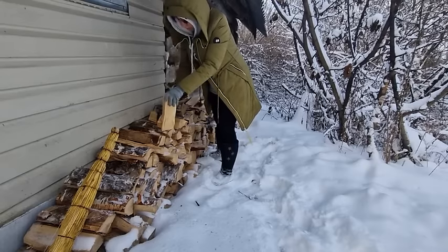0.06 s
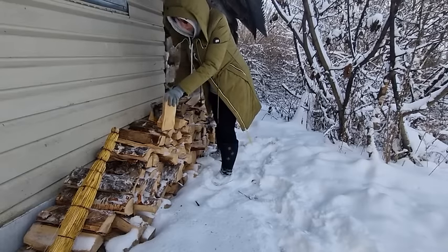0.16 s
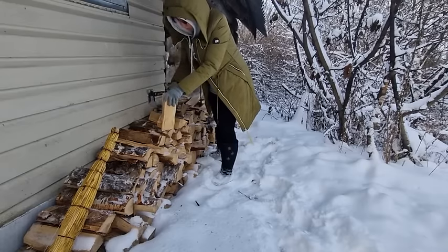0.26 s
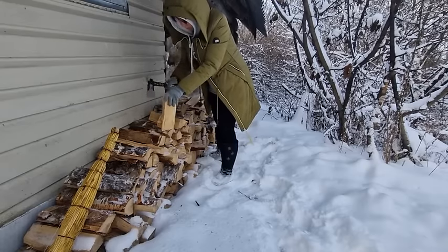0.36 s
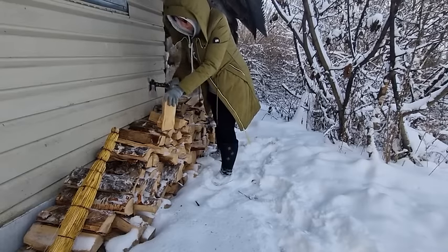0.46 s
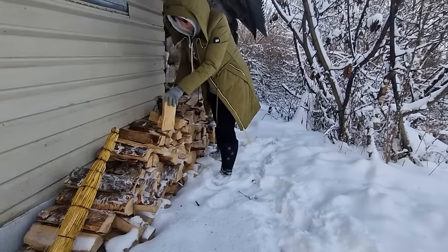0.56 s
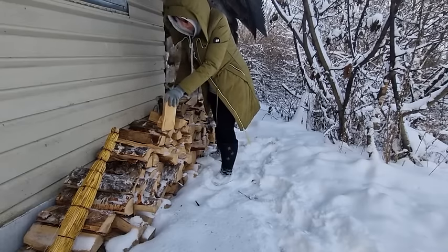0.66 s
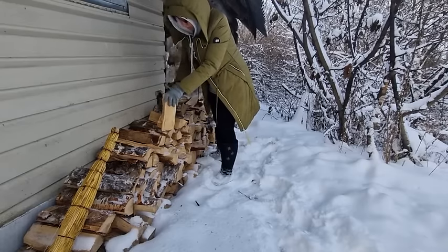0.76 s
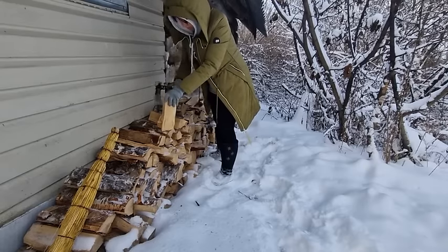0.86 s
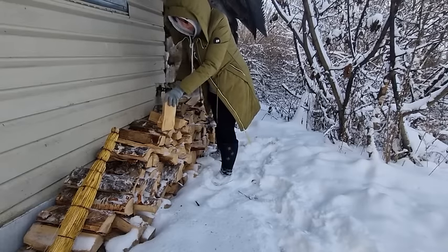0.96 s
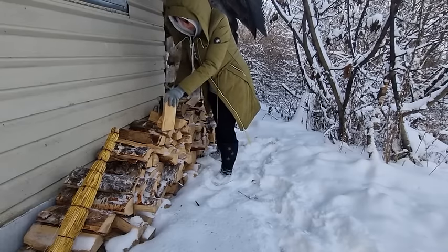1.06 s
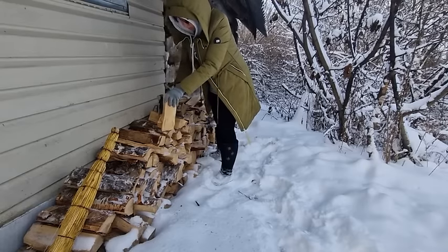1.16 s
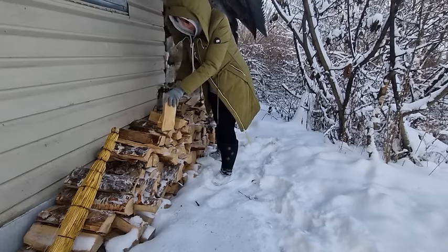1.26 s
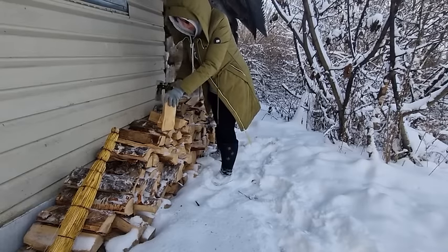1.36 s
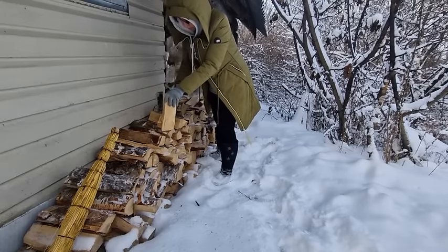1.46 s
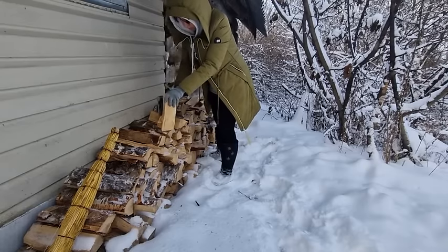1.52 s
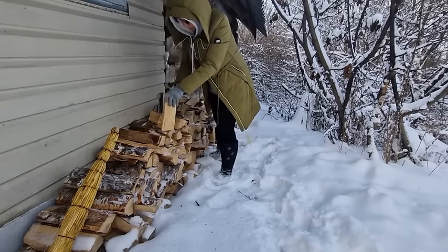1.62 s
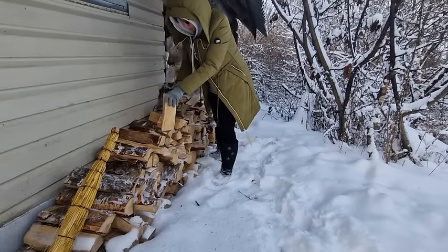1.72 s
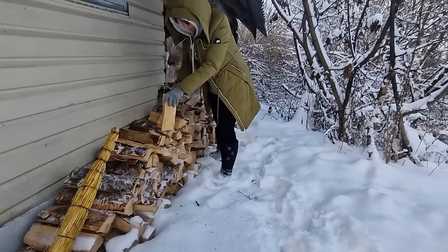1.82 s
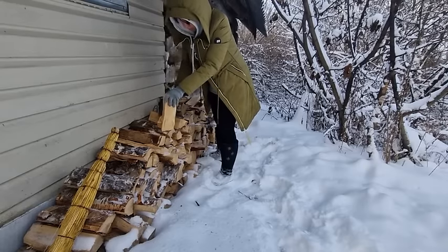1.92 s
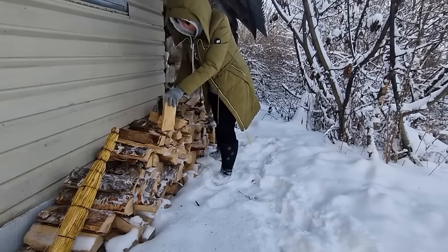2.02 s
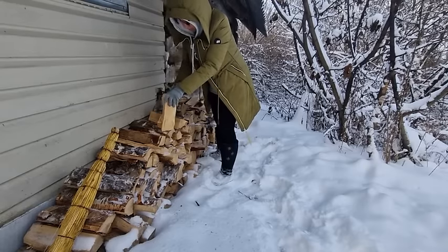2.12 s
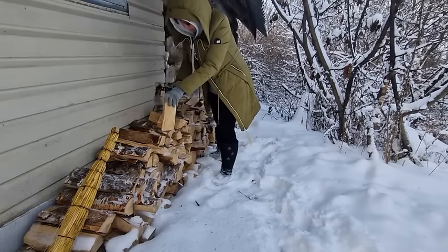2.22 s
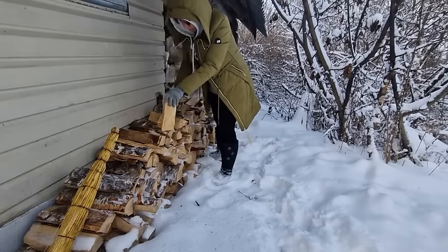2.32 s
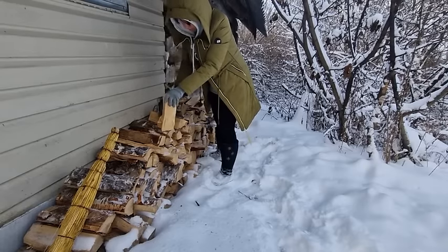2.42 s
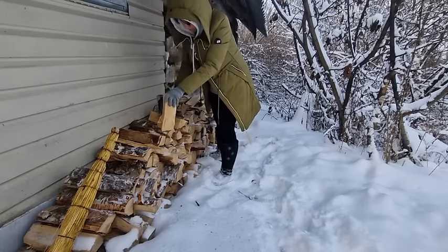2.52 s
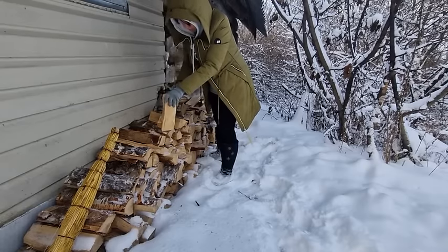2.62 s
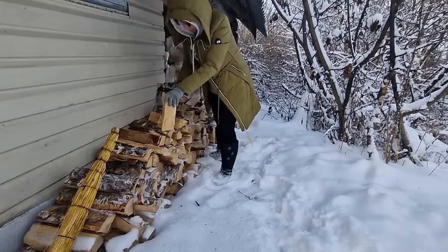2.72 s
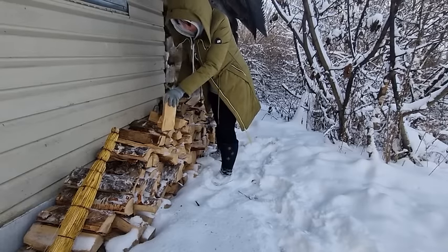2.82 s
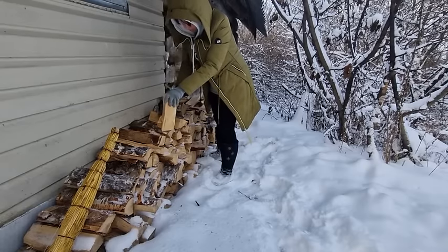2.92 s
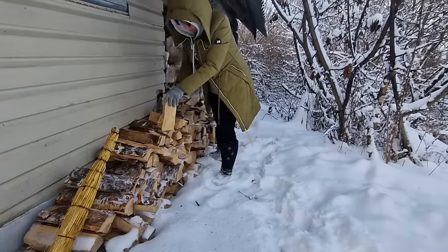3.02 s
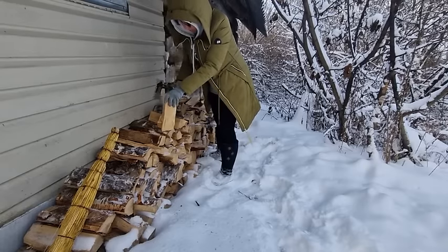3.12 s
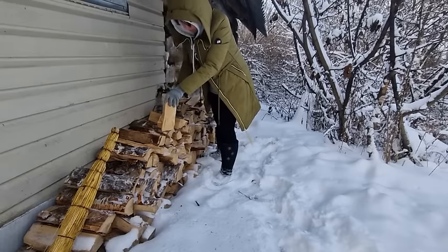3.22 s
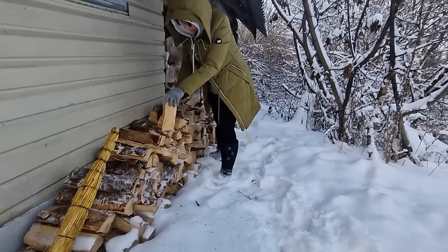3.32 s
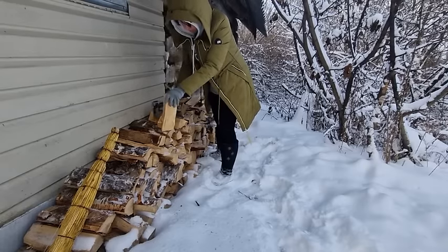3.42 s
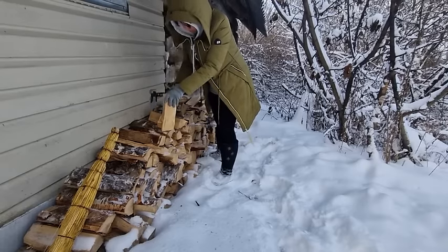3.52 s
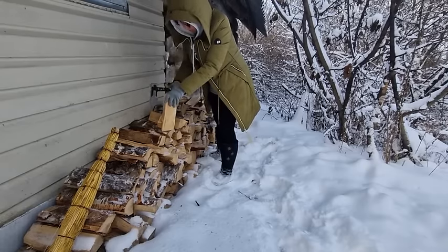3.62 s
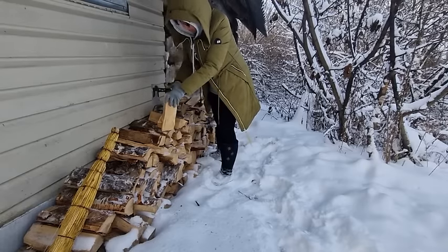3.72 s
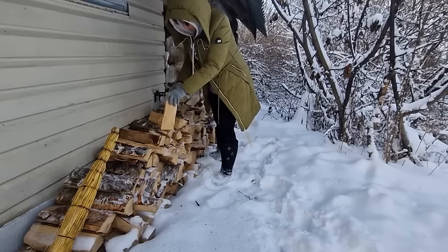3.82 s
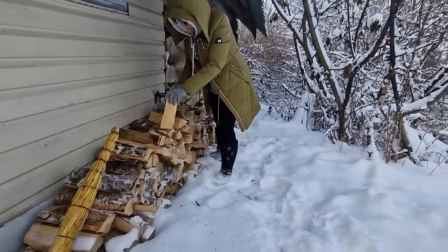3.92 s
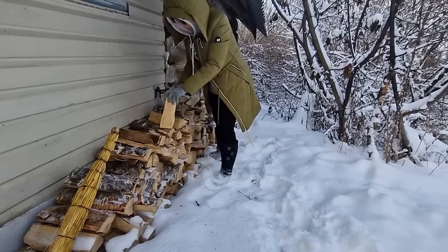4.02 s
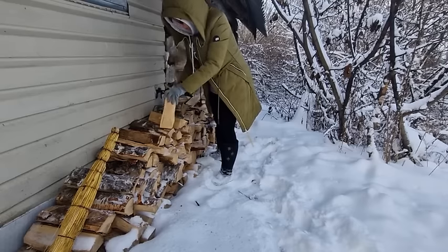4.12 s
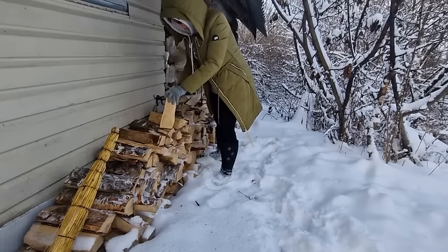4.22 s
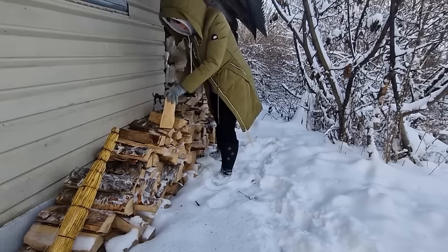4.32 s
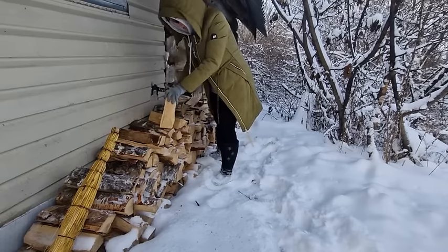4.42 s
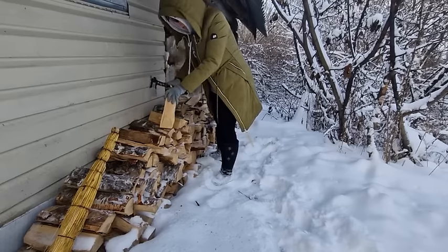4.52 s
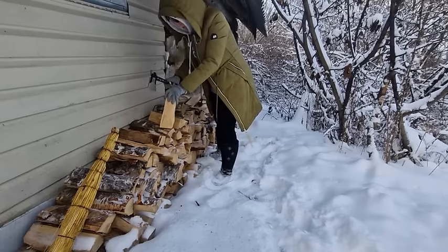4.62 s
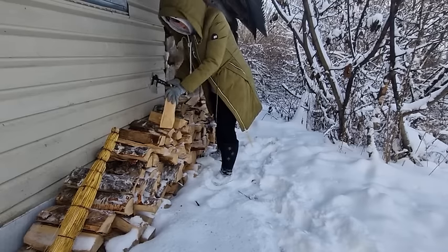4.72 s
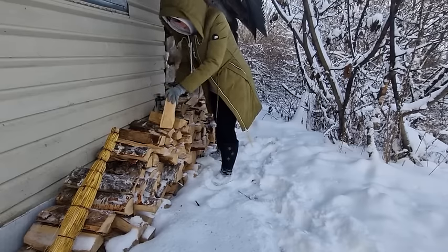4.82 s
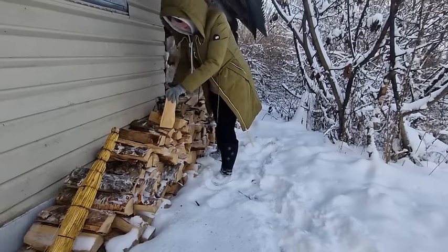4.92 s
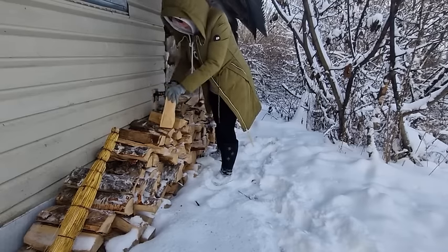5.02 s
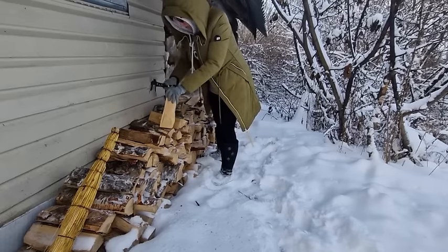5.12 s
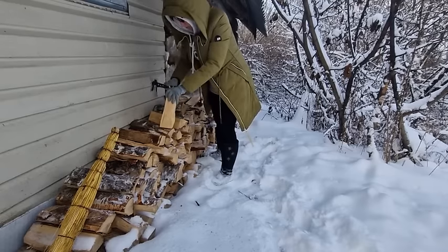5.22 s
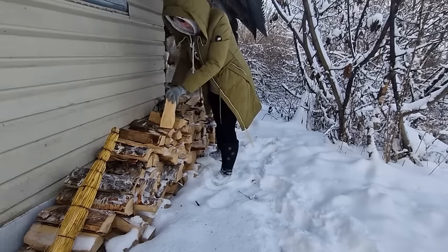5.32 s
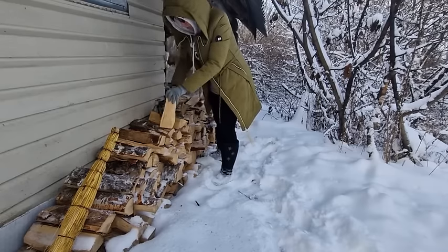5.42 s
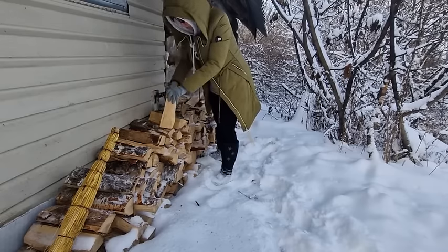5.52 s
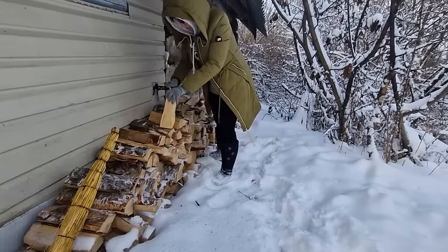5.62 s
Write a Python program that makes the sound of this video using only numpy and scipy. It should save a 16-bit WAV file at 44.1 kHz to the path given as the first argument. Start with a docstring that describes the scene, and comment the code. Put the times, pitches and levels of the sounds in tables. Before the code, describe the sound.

Outdoors in still winter air, a small hatchet chops an upright billet standing on a woodpile, close and slightly left in stereo. A light touch at 0.11 s leads straight into a hard, bright crack at 0.16 with a hollow knock around 800 Hz; small pieces tick after it. Blows follow at 0.66 (duller), 1.13, 1.57, a soft one at 2.0, a crisp one at 2.45, a weak one at 2.92, and a quick double at 3.38 and 3.45, bright then dull. Each thumps the support log and rocks the pile with a short low rumble. From about 3.6 to 4.9 there is a pause: a faint squeak, very soft coat rustle near 3.8-4.4. A thin, dry, bright crack comes at 4.94, a tick at 5.01, a tiny squeak at 5.34, then at 5.43 a sharp tearing split with a short ringing sliver and a last faint squeak. Wall and logs reflect tightly; trees answer faintly.

```python
"""A hatchet splits kindling off a billet on a woodpile, left of the microphones, by a house wall in deep snow.
Each blow is a burst of crushing fibres that rings blade, billet and support log as decaying modes;
low modes and dying noise rock the pile. Tears are fading crackles, and the last blow frees a ringing sliver.
Loose pieces tick, the billet squeaks faintly and a coat rustles in the pause, over still air of shaped noise.
The wall, the logs and the distant trees send the sound of the work back."""
import sys
import numpy as np
from scipy import signal
from scipy.fft import rfft, irfft, next_fast_len
from scipy.io import wavfile

SR = 44100
rng = np.random.default_rng(int(sys.argv[2]) if len(sys.argv) > 2 else 0)


def output_pcm(signal):
    """Save a mono or channel-first signal as 16-bit PCM at the path in sys.argv[1].

    Samples are clipped to [-1, 1] before scaling.
    """
    pcm = np.clip(np.atleast_2d(signal).T, -1, 1) * 32767
    wavfile.write(sys.argv[1], SR, np.round(pcm).astype(np.int16))


N = 249606

# Source levels are nominal: random spread, reflections and the side balance come on top.
# The blows: t/s, crack level/dB, crack treble roll-off f/Hz, billet level/dB,
# billet overtone tilt [dB per octave], support log level/dB, thump level/dB
BLOWS = [(0.1125, -32, 9000, -31, 0, -25.5, -23.5), (0.1603, -18.5, 12980, -11, 0, -18.5, -17.5),
         (0.6580, -17.5, 6810, -24, 7.5, -20.5, -10), (1.1332, -18.5, 9800, -12, 0, -17, -9.5),
         (1.5730, -15.5, 5800, -12, 0, -16, -12.5), (2.0034, -30, 8500, -27, 1, -26.5, -17),
         (2.4490, -17.2, 13000, -21.5, 4.5, -19.5, -12.5), (2.9232, -26.5, 14000, -29.5, 5.5, -22, -19),
         (3.3836, -16, 11500, -30, -1, -18, -21), (3.4497, -21, 1700, -27, 7, -20.5, -15.5),
         (4.9440, -22.5, 22000, -37, -1, -42, -20.5), (5.4315, -26, 6500, -44, 8, -49, -37),
         (5.4385, -19, 32000, -42, -1, -46, -22.5)]
# Spectrum of tearing and easing fibres: f/Hz, level/dB (per Hz)
FIBRE_SPECTRUM = [(200, -5.5), (700, 5), (1500, -0.5), (2500, -1), (4000, -1.5), (8500, -0.5),
                  (11000, -5.5), (16000, -4.5)]
# Left-right likeness of the fibre sounds: f/Hz, correlation [0 to 1]
CRACK_LIKENESS = [(500, 0.9245), (1500, .6), (3000, 0.9), (6000, 0.12), (15000, 0.13)]
# Left-right likeness of the air and the coat: f/Hz, correlation [0 to 1]
AIR_LIKENESS = [(100, 0.58), (400, 0.41), (1500, 0.27), (6000, 0.11)]


def amp(db):
    """Amplitude factor of a level in dB."""
    return 10 ** (np.asarray(db) / 20)


def read(points, hz):
    """A table's value at hz, on a log-frequency axis."""
    f, value = np.transpose(points)
    return np.interp(np.log(hz + 1), np.log(f), value)


def add(mix, s, sound):
    """Mixes a sound in from time s, cut off at the end of the mix."""
    part = mix[..., round(s * SR):][..., :sound.shape[-1]]
    part += sound[..., :part.shape[-1]]


def colour(pair, spectrum, likeness, bright_hz=SR):
    """Gives two noise signals a spectrum, a treble roll-off and a left-right likeness."""
    size = next_fast_len(pair.shape[1] + 1024)
    hz = np.fft.rfftfreq(size, 1 / SR)
    first, second = rfft(pair, size)
    same = np.clip(read(likeness, hz), -1, 1)
    gain = amp(read(spectrum, hz))
    gain = gain / np.sqrt(np.mean(gain ** 2))
    gain = gain / (1 + (hz / bright_hz) ** 2)
    # minimum phase, so that nothing sounds ahead of its onset
    both_halves = np.r_[gain, gain[1:size - len(hz) + 1][::-1]]
    causal = np.exp(np.conj(signal.hilbert(np.log(both_halves))))[:len(hz)]
    sides = np.array([first, same * first + np.sqrt(1 - same ** 2) * second])
    return irfft(sides * causal, size)[:, :pair.shape[1]]


def snaps(t, grain_db):
    """Dense fibre snaps of uneven size, a new size every millisecond."""
    ms = (t * 1000).astype(int)
    size = amp(grain_db * np.clip(rng.standard_normal(ms[-1] + 1), -2, 2))
    return rng.standard_normal((2, len(t))) * size[ms] / np.sqrt(np.mean(size ** 2))


def ring(modes, rise_s, spread_db, pitch=1, detune=.01, chatter_hz=0):
    """Modes swell and die; each strike weights them differently, and a chattering contact widens their lines."""
    t, knots = np.arange(SR) / SR, np.linspace(0, 1, 500)
    hz, db, t60 = np.transpose(modes)[:, :, None]
    weight, drift, phase = rng.standard_normal((3, len(modes), 1))
    # the phase of each mode wanders at random
    steps = rng.standard_normal((len(modes), len(knots)))
    walks = np.cumsum(steps, 1) * np.sqrt(chatter_hz * knots[1] / (2 * np.pi))
    wander = np.array([np.interp(t, knots, walk) for walk in walks])
    waves = np.sin(2 * np.pi * (hz * pitch * (1 + detune * drift) * t + phase + wander))
    decay = np.exp(-np.log(1000) * t / t60)
    swell = 1 - np.exp(-(t / rise_s) ** 2)
    return (amp(db + spread_db * weight) * decay * waves).sum(0) * swell


def crack(spectrum, bite_s, bright_hz, rise_s, uneven_db):
    """Fibres crush for a few milliseconds; each spot of the grain has its own peaks and dips."""
    t = np.arange(SR // 10) / SR
    force = (1 - np.exp(-t / rise_s)) / (1 + (t / bite_s) ** 4.0)
    hz = np.geomspace(100, 16000, 90)
    spot = np.c_[hz, read(spectrum, hz) + uneven_db * rng.standard_normal(len(hz))]
    return colour(snaps(t, grain_db=3.5) * force, spot, CRACK_LIKENESS, bright_hz)


def dying_noise(t60s, levels, size):
    """One second of noise for each side, each band dying at its own speed."""
    hz, t, bands = signal.stft(rng.standard_normal((2, SR)), SR, nperseg=size)
    rate = np.log(1000) / read(t60s, hz)[:, None]
    level = amp(read(levels, hz))[:, None] * np.sqrt(2 * rate / SR)  # same energy however long the decay
    return signal.istft(bands * level * np.exp(-rate * t), SR, nperseg=size)[1][:, :SR]


def still_air():
    """Still winter air: steady noise, strongest in the bass and little alike at the two sides."""
    # Spectrum of the air: f/Hz, level/dB (per Hz)
    air_spectrum = [(20, 4), (60, 1.5), (100, -8), (230, -24.5), (350, -14), (560, -22.5), (800, -22),
                    (1200, -27.5), (2500, -34), (5000, -39), (7000, -44.5), (10000, -48), (16000, -47.5)]
    return amp(-63) * colour(rng.standard_normal((2, N)), air_spectrum, AIR_LIKENESS)


def hatchet():
    """Each blow cracks the grain and rings the blade and the billet, then the log it stands on."""
    # Spectrum of the bite: f/Hz, level/dB (per Hz)
    bite_spectrum = [(100, -10), (350, -0.5), (800, 2.5), (1500, 4.5), (2100, 0), (2600, -5), (3200, -1),
                     (4600, 1.5), (6800, -4), (8200, 2.5), (10000, -4), (15500, -1.5)]
    # Short, high modes of the blade wedged in the grain: f/Hz, level/dB, t60 [s]
    blade_modes = [(3000, -2, 0.029), (3290, -1, 0.033), (3640, -6, 0.01), (4096, -2.5, 0.039),
                   (4755, 2, 0.035), (5110, -1, 0.041), (6330, -0.5, 0.018), (7670, 0.5, 0.028),
                   (8170, -3, 0.019)]
    # Modes of the billet: f/Hz, level/dB, t60 [s]
    billet_modes = [(829.6, 0, 0.072), (937, -10.5, 0.032), (931, -10.5, 0.048), (1026, -7, .052),
                    (1157, -11, .035), (1314, -18, 0.066), (1484, -14, .035), (1520, -11.5, 0.043),
                    (1622, -11.5, 0.064), (2117, -18, 0.053), (2277, -20.5, 0.064)]
    # Modes of the log under the billet: f/Hz, level/dB, t60 [s]
    support_modes = [(229.76, -10.5, 0.14), (305, -9.5, 0.09), (330.3, -6, 0.19), (387, -3, .085),
                     (465, -2.5, .07), (545, -7.5, 0.11), (595, -2.5, .055), (690.5, -2.5, 0.079),
                     (751.5, -8, .08)]
    blade_db = -11.5  # against the crack
    # a firm blow bites for firm_bite_s; a softer one crushes the grain more slowly
    firm_db, firm_bite_s, bite_doubles_db = -20, .0058, 15
    out = np.zeros((2, N))
    for s, crack_db, bright_hz, billet_db, overtone_db, support_db, _ in BLOWS:
        bite_s = firm_bite_s * 2 ** ((firm_db - crack_db) / bite_doubles_db)
        pitch = .987 + .014 * rng.uniform(-1, 1)  # the grip and the footing shift a little
        bite = crack(bite_spectrum, bite_s, bright_hz, rise_s=.0008, uneven_db=2.8)
        add(out, s, amp(crack_db) * bite)
        blade = np.array([ring(blade_modes, rise_s=0.00027, spread_db=2.0, detune=.018, chatter_hz=60)
                          for side in "LR"])
        dulling = 1 + (4500 / bright_hz) ** 2  # a dull blow barely rings the blade
        add(out, s, amp(crack_db + blade_db) / dulling * blade)
        # where the edge lands decides how strongly the billet's higher modes answer
        lowest_hz = billet_modes[0][0]
        tilted = [(hz, db + overtone_db * np.log2(hz / lowest_hz), t60) for hz, db, t60 in billet_modes]
        billet = ring(tilted, rise_s=.003, spread_db=2.5, pitch=pitch, detune=.008, chatter_hz=21.99)
        add(out, s, amp(billet_db) * billet)
        support = ring(support_modes, rise_s=0.0017, spread_db=1.0, pitch=pitch, detune=.02, chatter_hz=18)
        add(out, s, amp(support_db) * support)
    return out


def easing():
    """After each blow, fibres keep giving way around the wedged blade in a brief crackle."""
    ease_db, fade_db_per_s = -20.5, 400  # level and fade against the crack
    out, t = np.zeros((2, N)), np.arange(SR // 4) / SR
    for s, crack_db, bright_hz, *_ in BLOWS:
        run = amp(crack_db + ease_db - fade_db_per_s * t) * (1 - np.exp(-t / .006))
        crackle = colour(snaps(t, grain_db=5.5), FIBRE_SPECTRUM, CRACK_LIKENESS, 1.7 * bright_hz)
        add(out, s, run * crackle)
    return out


def woodpile():
    """The support log thumps down and jostles its neighbours; a moment later the whole pile rocks."""
    # Modes of the thump: f/Hz, level/dB, t60 [s]
    thump_modes = [(126.8, -0.5, 0.12), (152, -12.5, .09), (94.7, -6, 0.12)]
    # Modes of the rocking pile: f/Hz, level/dB, t60 [s]
    pile_modes = [(34.3, -12.5, 0.99), (45, -7.5, 0.65), (62.3, 0, 0.52), (71.4, -6, 0.53),
                  (85.04, -6, 0.48), (135, -12.5, 0.18)]
    # Decay of logs jostling deep in the pile: f/Hz, t60 [s]
    jostle_t60 = [(30, 0.9), (70, .5), (130, 0.41), (250, 0.2217), (500, 0.117)]
    # Spectrum of the jostling: f/Hz, level/dB
    jostle_levels = [(20, -6.5), (60, -1), (130, 0), (250, -4.5), (400, -7.5), (700, -25), (2000, -59)]
    thump_after_s, rock_after_s = .003, .041
    # rocking follows only a share of any change in the thump, and the jostling follows the rocking
    firm_thump_db, firm_rock_db, rock_share, jostle_gain_db = -15, -29, .22, 49.3
    out, t = np.zeros(N), np.arange(SR) / SR
    for s, *_, thump_db in BLOWS:
        rock_db = firm_rock_db + rock_share * (thump_db - firm_thump_db)
        thump = ring(thump_modes, rise_s=0.01, spread_db=0.73, detune=.022)
        add(out, s + thump_after_s, amp(thump_db) * thump)
        rocking = ring(pile_modes, rise_s=0.0065, spread_db=1.16, detune=.05)
        add(out, s + rock_after_s, amp(rock_db) * rocking)
        jostle = dying_noise(jostle_t60, jostle_levels, size=1024)[0] * (1 - np.exp(-t / 0.0039))
        add(out, s + thump_after_s, amp(rock_db + jostle_gain_db) * jostle)
    return out


def splitting():
    """A split runs down the grain in a fading crackle, and a freed sliver rings as short modes."""
    # Fibres tearing along the grain: t/s, level/dB, length [s], fall over that length [dB]
    tears = [(0.123, -29.5, .014, 0.5), (0.137, -44, 0.023, 8.5), (3.394, -51.5, 0.062, 10),
             (4.961, -45.5, .07, 23), (5.44, -24.5, .01, 4), (5.449, -45, .085, 13.5)]
    # The sliver springing free: t/s, level/dB
    freed = [(5.4424, -16.5)]
    # Modes of the sliver: f/Hz, level/dB, t60 [s]
    sliver_modes = [(1300, -5.5, 0.038), (1224, -8, 0.034), (1404, -10.5, 0.022), (2370, -8.5, 0.028),
                    (3800, -7, 0.026)]
    out = np.zeros((2, N))
    for s, db, length_s, fall_db in tears:
        t = np.arange(0, 2 * length_s, 1 / SR)
        fade = amp(db - fall_db * t / length_s)
        run = fade * (1 - np.exp(-t / 0.0014)) / (1 + (t / length_s) ** 10)
        add(out, s, colour(snaps(t, grain_db=6.5) * run, FIBRE_SPECTRUM, CRACK_LIKENESS))
    for s, db in freed:
        add(out, s, amp(db) * ring(sliver_modes, rise_s=0.0011, spread_db=1.5, detune=.004, chatter_hz=25))
    return out


def loose_pieces():
    """Light, scuffing touches of wood on wood, each followed by a fainter bounce."""
    # Loose pieces touching: t/s, level/dB
    ticks = [(0.246, -43.5), (0.322, -59), (0.408, -55.5), (0.817, -52), (2.061, -53), (2.102, -55),
             (2.505, -52), (2.565, -53), (3.023, -58), (5.014, -46)]
    # Spectrum of loose sticks: f/Hz, level/dB (per Hz)
    stick_spectrum = [(200, -14), (800, -1.5), (1400, -1.5), (2100, 4), (2800, -1), (4000, 4), (5200, 0.5),
                      (8200, 1), (10000, -8), (16000, -9.5)]
    out = np.zeros((2, N))
    for s, db in ticks:
        bounce_s = s + rng.uniform(.007, 0.018)
        for at, drop_db in [(s, 0), (bounce_s, 10)]:
            touch = crack(stick_spectrum, bite_s=0.0064, bright_hz=7500, rise_s=0.0014, uneven_db=3.5)
            add(out, at, amp(db - drop_db) * touch)
    return out


def squeaks():
    """Faint, short squeaks as the billet is handled: single modes with a wavering phase."""
    # The squeaks: t/s, f/Hz, level/dB
    calls = [(3.643, 1655, -62), (5.343, 3290, -65), (5.585, 1500, -63)]
    t60_s = .11
    out = np.zeros((2, N))
    for s, hz, db in calls:
        add(out, s, ring([(hz, db, t60_s)], rise_s=.012, spread_db=.5, chatter_hz=70))
    return out


def coat():
    """The uneven scuffs of a coat sleeve swell and fade with each stroke, above a very faint steady rub."""
    # Strokes of the sleeve: t/s, length [s], level/dB
    strokes = [(3.8, .17, -76.5), (3.96, .27, -76.5), (4.22, .19, -82)]
    # Spectrum of the cloth: f/Hz, level/dB (per Hz)
    coat_spectrum = [(200, 2.5), (1000, 1.5), (2500, -0.5), (5000, -1), (8500, 0), (10000, -9.5),
                     (16000, -12.5)]
    t = np.arange(N) / SR
    rub = np.full(N, amp(-93))
    for s, length_s, db in strokes:
        add(rub, s, amp(db) * np.sin(np.linspace(0, np.pi, round(length_s * SR))))
    knots = np.arange(0, t[-1], .012)
    scuff_db = 2.1 * np.interp(t, knots, rng.standard_normal(len(knots)))
    return rub * amp(scuff_db) * colour(snaps(t, grain_db=3), coat_spectrum, AIR_LIKENESS)


def echoes(x, t60s, levels, start_s, count=3):
    """Many small reflections, other ones for each side; their pattern changes slowly, so tails differ."""
    out, t = np.zeros((2, N)), np.arange(N) / SR
    for k in range(count):
        share = np.sqrt(2 / count) * np.cos(np.pi * (t + k / count))  # the squares sum to 1
        reflections = dying_noise(t60s, levels, size=256)
        add(out, start_s, signal.fftconvolve(x * share, reflections, axes=1))
    return out


def yard(x, wall_s, wall_lead_s, wall_db):
    """The siding on the left throws the sound straight back, the logs scatter it, the trees answer faintly."""
    # Decay of the scatter among the logs: f/Hz, t60 [s]
    scatter_t60 = [(100, 0.15), (500, 0.16), (1500, 0.11), (4000, 0.104), (15000, 0.0052)]
    # Spectrum of that scatter: f/Hz, level/dB
    scatter_levels = [(100, -23), (400, -14.5), (1000, -7.5), (3000, -9), (15000, -11.5)]
    # Decay of the return from the trees: f/Hz, t60 [s]
    trees_t60 = [(100, 0.85), (800, 0.8779), (4000, .5), (15000, 0.24)]
    # Spectrum of that return: f/Hz, level/dB
    trees_levels = [(100, -38.5), (800, -41), (1600, -39.5), (4000, -35), (9000, -36), (15000, -39)]
    scatter = echoes(x, scatter_t60, scatter_levels, start_s=0.0025)
    trees = echoes(x, trees_t60, trees_levels, start_s=0.045)
    out = x + scatter + trees
    siding = signal.butter(1, [300, 7000], "band", fs=SR, output="sos")
    thrown = amp(wall_db) * signal.sosfilt(siding, x)
    add(out[0], wall_s, thrown[0])
    add(out[1], wall_s + wall_lead_s, thrown[1])
    return out


def scene():
    """The work is a little left of the microphones, so it reaches that side first."""
    left_lead_s = .000095
    out = still_air()
    work = hatchet() + easing() + splitting() + loose_pieces() + squeaks()
    left, right = yard(work, wall_s=.0049, wall_lead_s=.00022, wall_db=-6.5) + woodpile()
    add(out[0], 0, left * amp(0.5))
    add(out[1], left_lead_s, right * amp(1.1))
    return out + coat()


def record(dry):
    """The recorder's band limit: a linear-phase low-pass that removes the highest treble."""
    edge_hz = 16300
    low_pass = signal.firwin(301, edge_hz, window=("kaiser", 9), fs=SR)
    return signal.oaconvolve(dry, low_pass[None], "same")


dry = scene()
out = record(dry)
output_pcm(out)
```